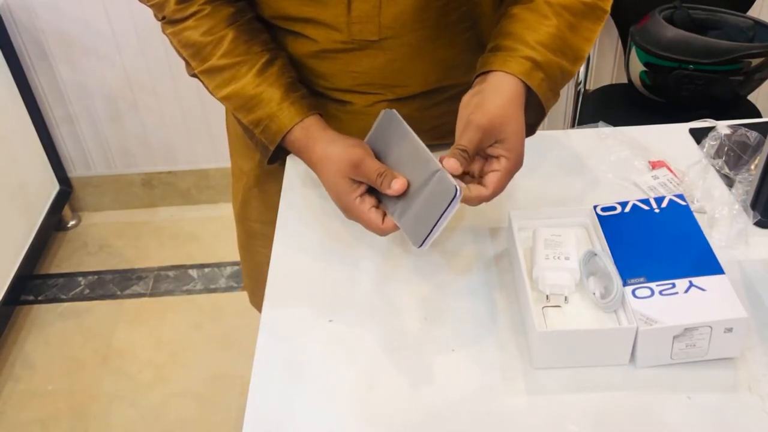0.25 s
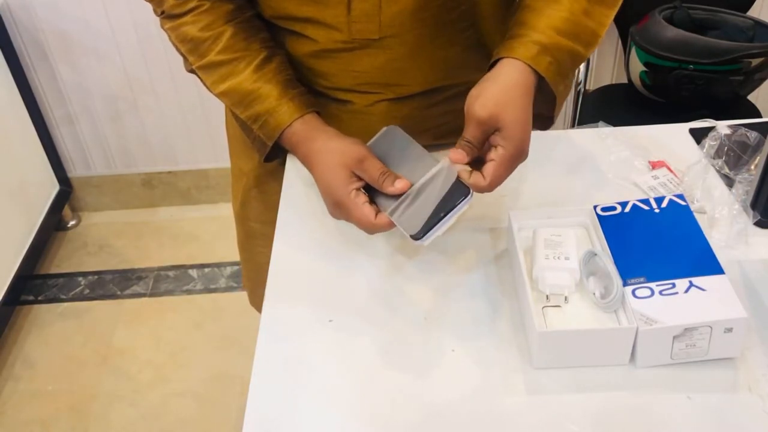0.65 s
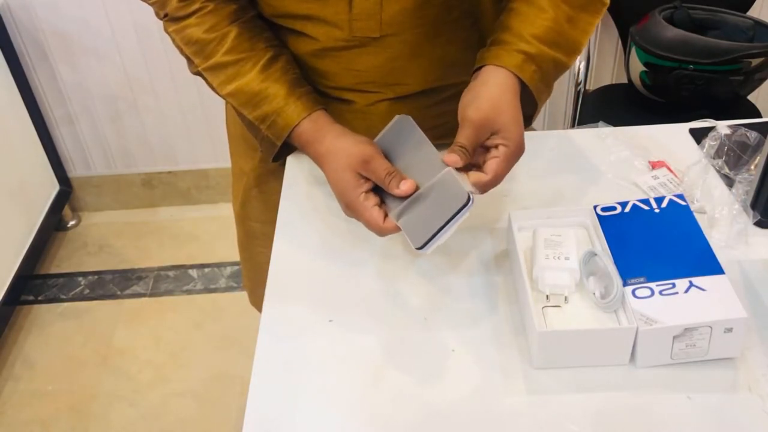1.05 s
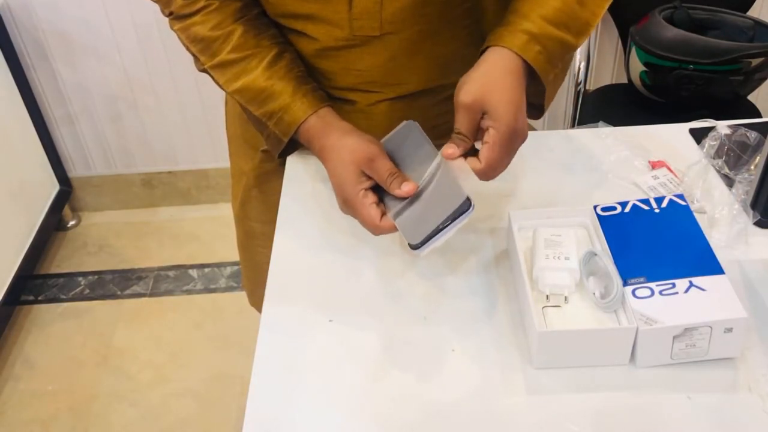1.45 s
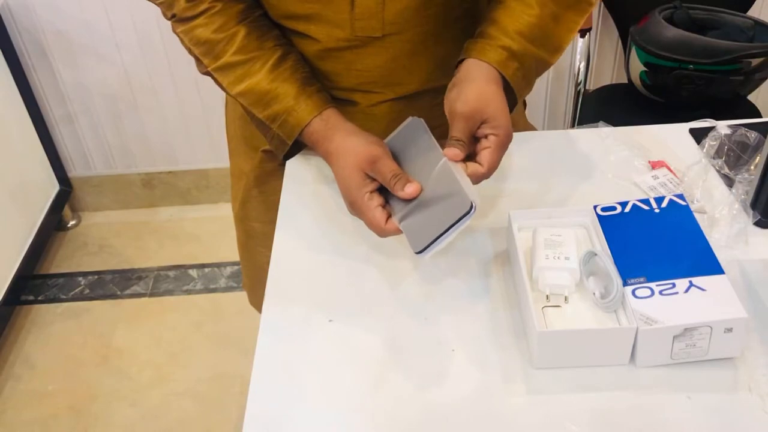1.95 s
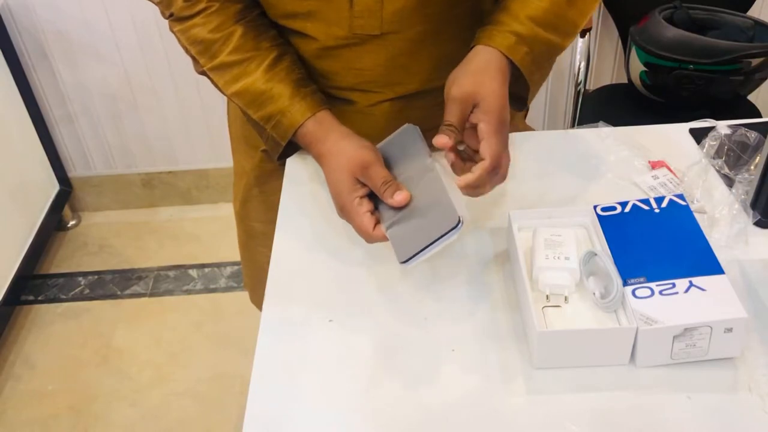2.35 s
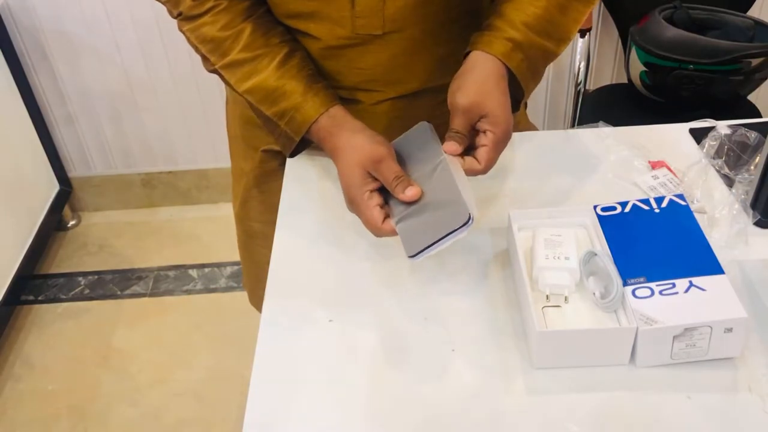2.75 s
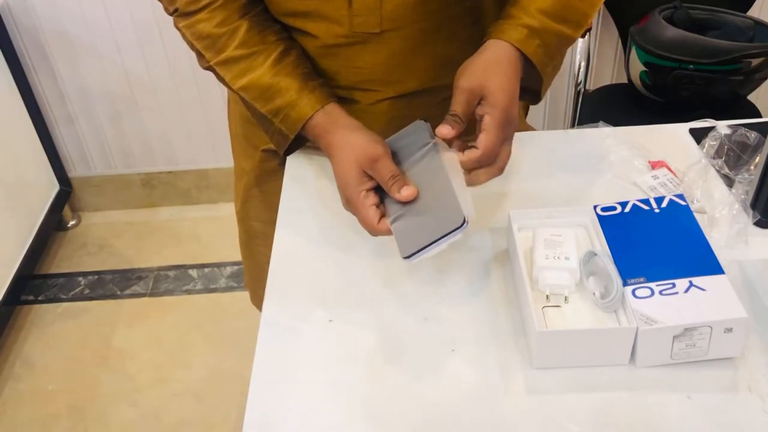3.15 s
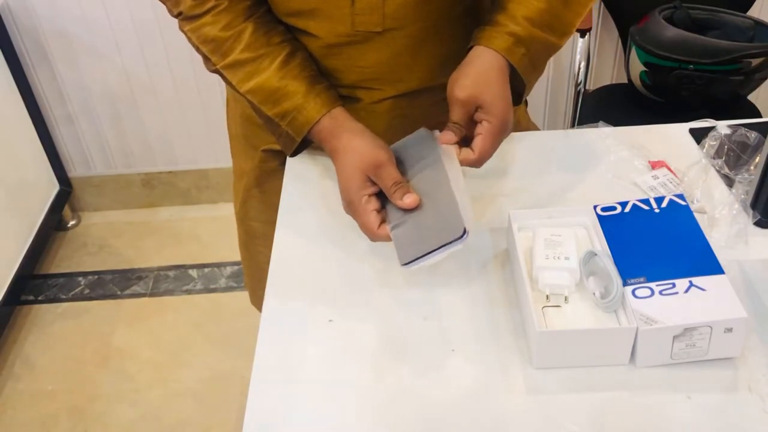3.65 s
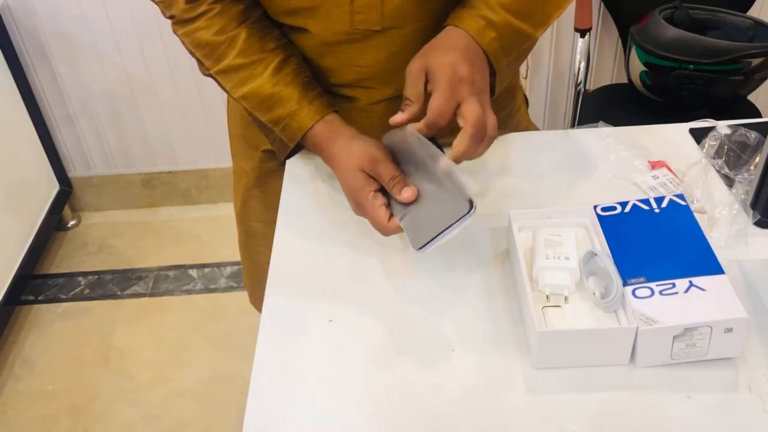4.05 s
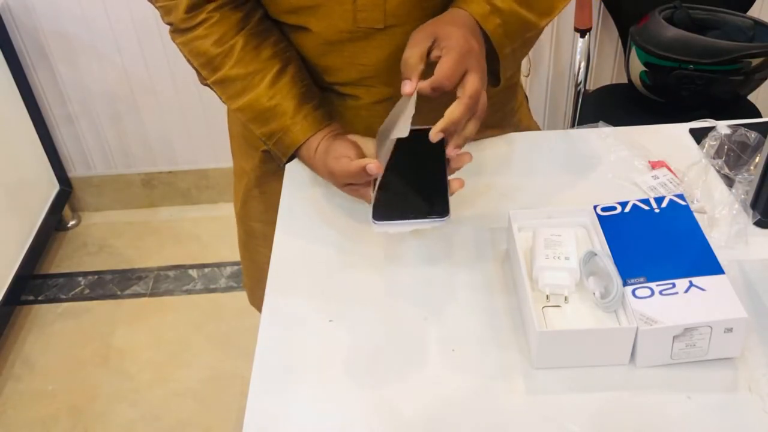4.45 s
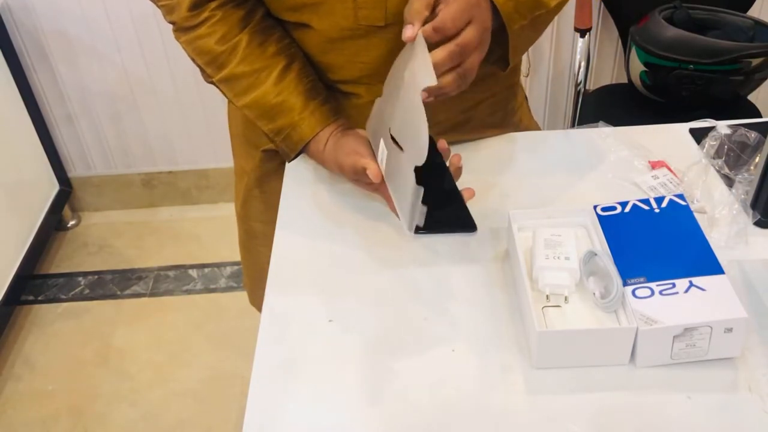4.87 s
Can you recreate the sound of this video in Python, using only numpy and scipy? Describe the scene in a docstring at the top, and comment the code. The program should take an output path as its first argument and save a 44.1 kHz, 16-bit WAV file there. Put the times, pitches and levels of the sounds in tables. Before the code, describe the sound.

Crisp plastic crinkling and snapping comes in flurries in a small hard-walled shop, thinning to faint ticks over quiet ventilation and a distant engine.

```python
"""In a small shop, close to the microphone, fingers pick at the thin plastic film around a new phone and peel it.
From the start there are air noise, a ventilation hum and a far engine drone, rising in pitch until 3.8 s.
From 0.2 to 3.6 s come flurries: film sizzling as it lets go, sharp snaps, hollow pops and a rubbing sleeve,
all made of shaped noise and pulses; film, snaps and pops also ring off the hard walls.
Then the snaps get sparser and mostly weaker, until after 4.9 s little but nail ticks and background remains."""
import sys
import numpy as np
from scipy import signal
from scipy.fft import rfft, irfft
from scipy.io import wavfile
from scipy.ndimage import uniform_filter1d

SR = 44100
rng = np.random.default_rng(int(sys.argv[2]) if len(sys.argv) > 2 else 0)


def master(y):
    """Save y as 16-bit WAV."""
    cut = np.clip(np.atleast_2d(y).T, -1, 1)
    pcm = np.round(cut * 32767)  # scale
    wavfile.write(sys.argv[1], SR, pcm.astype(np.int16))


N = 225457
EDGE_HZ = 16150  # upper limit of the recorder


def gain_of(db):
    """Decibels to an amplitude factor."""
    return 10 ** (np.asarray(db) / 20)


def evened(x):
    """Scales to rms 1."""
    return x / np.sqrt(np.mean(x ** 2) + 1e-20)


def with_energy(sound, db):
    """Scales a short sound to this energy below the recorder's upper limit."""
    audible = np.fft.rfftfreq(len(sound), 1 / SR) < EDGE_HZ
    return sound * gain_of(db) / np.sqrt(np.mean(abs(rfft(sound)) ** 2 * audible))


def read(points, hz):
    """Reads a spectrum table on a log-frequency axis."""
    f, value = np.transpose(points)
    return np.interp(np.log(hz + 1), np.log(f + 1), value)


def follow(rows):
    """The columns of a curve over time, at every sample."""
    s, *columns = np.transpose(rows)
    return [np.interp(np.arange(N) / SR, s, c) for c in columns]


def add(mix, s, sound):
    """Lays a sound into the mix at time s."""
    part = mix[max(round(s * SR), 0):][:len(sound)]
    part += sound[:len(part)]


def drift(hz):
    """Slow random wandering of rms 1, mostly below this frequency."""
    spectrum = rfft(rng.standard_normal(N))
    lowpass = np.exp(-(np.fft.rfftfreq(N, 1 / SR) / hz) ** 2)
    return evened(irfft(spectrum * lowpass, N))


def causal(gain):
    """Minimum-phase impulse response with this gain: it starts at once and rings out."""
    log_gain = np.log(np.maximum(gain, 1e-5))
    circle = np.r_[log_gain, log_gain[-2:0:-1]]
    return np.fft.ifft(np.exp(np.conj(signal.hilbert(circle)))).real


# Still air in the shop. Each row: frequency in Hz, relative level in dB per Hz.
AIR_COLOUR = [(20, -28), (40, -8), (65, -2.5), (85, -6.5), (120, -2.5), (165, 0), (220, -6), (400, -9),
              (800, -16), (1600, -37), (2300, -48), (3000, -17), (4000, -48), (6000, -29), (15000, -41)]
AIR_DB = -58  # rms


def still_air():
    """Steady noise of the room's air, shaped in frequency."""
    gain = gain_of(read(AIR_COLOUR, np.fft.rfftfreq(N, 1 / SR)))
    return gain_of(AIR_DB) * evened(irfft(rfft(rng.standard_normal(N)) * gain, N))


def tone(hz, db, waver=0.0049, throb=0.34):
    """A sine that wavers in pitch and strength by these random shares."""
    turns = np.cumsum(hz * (1 + waver * drift(4.9))) / SR + rng.random()
    steady = gain_of(db) * np.sqrt(2) * np.sin(2 * np.pi * turns)
    return steady * (1 + throb * drift(1.5))


# Tones of the ventilation. Each row: frequency in Hz, rms level in dB before swell and throb.
FAN_TONES = [(39, -94), (77, -71.5), (98, -83), (118, -66.5), (154.5, -62)]
# The hum swells and sinks. Each row: time in seconds, change of level in dB.
FAN_SWELL = [(0, 4.5), (.5, 0.5), (1.7, 3), (2.2, -7), (2.8, -1.5), (4.2, 1), (5.1, -1.5)]


def ventilation():
    """Wavering fan tones that swell and sink together."""
    swell_db, = follow(FAN_SWELL)
    return sum(tone(hz, db + swell_db) for hz, db in FAN_TONES)


# Engine outside. Each row: time in seconds, cycle rate in Hz,
# level of the first order in dB, level of the second order in dB (both rms, before throb).
FAR_ENGINE = [(0, 56, -76, -69), (1, 57, -74, -68), (1.3, 58, -70, -60), (1.85, 60, -70, -58),
              (2.15, 61, -66, -65), (3, 64, -65, -67), (3.5, 65.5, -66, -65), (3.8, 66, -76, -72),
              (5.11, 66, -78, -76)]


def far_engine():
    """The drone of an engine's two lowest orders, at its cycle rate and twice that."""
    cycle_hz, first_db, second_db = follow(FAR_ENGINE)
    return tone(cycle_hz, first_db) + tone(2 * cycle_hz, second_db)


# How long the shop rings. Each row: frequency in Hz, time to fall by 60 dB in seconds.
SHOP_T60 = [(300, 1), (700, 0.42), (1500, 0.6), (3000, 0.61), (5500, 0.64), (9000, 0.46), (15000, 0.32)]
# What the walls return to the microphone. Each row: frequency in Hz, gain in dB.
WALL_COLOUR = [(200, -23), (450, 2), (610, 8), (720, -0.5), (1200, -8.5), (2200, -7), (4500, -10),
               (8000, -8.5), (15000, -9)]


def tail(first_s=0.001, build_s=0.011, early=1.0, early_s=0.011, spread_db=2):
    """Reflections build up within milliseconds; each band then dies at its own speed."""
    age = np.maximum(np.arange(SR) / SR - first_s, 0)
    taps = rng.choice([-1, 1], SR) * (rng.random(SR) < .2)
    taps = taps * gain_of(spread_db * rng.standard_normal(SR))
    taps *= (1 - np.exp(-age / build_s)) * (1 + early * np.exp(-age / early_s))
    hz, t, z = signal.stft(taps, SR, nperseg=256)
    fade = gain_of(-60 * t / read(SHOP_T60, hz)[:, None])
    ringing = signal.istft(z * fade, SR)[1]
    walls = gain_of(read(WALL_COLOUR, np.fft.rfftfreq(len(ringing), 1 / SR)))
    return irfft(rfft(ringing / np.linalg.norm(ringing)) * walls)[:SR * 3 // 4]


def room(x, shift_hz=11, count=3):
    """The echo blends several random tails in steady rotation, so no single tail's colouring stands out."""
    angle = 2 * np.pi * shift_hz * np.arange(N) / SR
    shares = [np.sqrt(2 / count) * np.cos(angle + np.pi * k / count) for k in range(count)]
    return sum(signal.fftconvolve(x * share, tail())[:N] for share in shares)


def rub(strength, colour, slips_per_s, spread_db, flicker_db, flicker_hz, size=1024):
    """Many tiny releases a second, of flickering level, coloured by the surface that slides."""
    slips = gain_of(spread_db * np.minimum(rng.exponential(1, N), 4)) * rng.choice([-1, 1], N)
    slips *= rng.random(N) < slips_per_s / SR
    surface = causal(gain_of(read(colour, np.fft.rfftfreq(size, 1 / SR))))
    rubbing = evened(signal.oaconvolve(slips, surface)[:N])
    return strength * gain_of(flicker_db * drift(flicker_hz)) * rubbing


# The film under fingers and nails. Each row: frequency in Hz, relative level in dB per Hz.
FILM_COLOUR = [(250, -10.5), (500, -9), (1000, -2), (2100, 1), (4400, 2), (6500, -1), (12000, -3),
               (15500, 1.5)]
NAILS_DB = -67.5  # before flicker


def nails():
    """Nails ticking faintly on the film: sparse tiny releases throughout."""
    return rub(gain_of(NAILS_DB), FILM_COLOUR, slips_per_s=45, spread_db=1.8, flicker_db=2, flicker_hz=20)


# every move of the hand sets in quickly and eases off
ATTACK_DB_PER_S, RELEASE_DB_PER_S = 904, 293


def strokes(moves):
    """Strength of the hand's moves (start s, hold s, dB) at every sample: attack, hold, release."""
    t = np.arange(N) / SR
    levels = []
    for start, hold, db in moves:
        rise = ATTACK_DB_PER_S * np.maximum(start - t, 0)
        fall = RELEASE_DB_PER_S * np.maximum(t - start - hold, 0)
        levels.append(db - rise - fall)
    return gain_of(np.max(levels, axis=0))


# Pulls of the hand, shared by sleeve, film and creases. Each row: start in seconds, hold in seconds,
# level of the film coming unstuck in dB, typical energy of its small creases in dB, level of the sleeve in dB.
HAND_PULLS = [(0.389, 0.17, -52.5, -19, -63), (0.672, 0.075, -44.5, -16.5, -61),
              (1.18, 0.087, -55, -16, -62), (1.397, .12, -61, -24, -55), (1.98, 0.042, -50, -19, -63),
              (2.219, 0.029, -43.5, -12.5, -65), (2.698, 0.081, -49.5, -25, -63),
              (3.038, 0.032, -57, -23, -55.5), (3.564, 0.011, -35.5, -26, -53), (3.869, .16, -51, -26, -61),
              (4.137, .04, -48.5, -19.5, -77), (4.212, .1, -49, -23, -68), (4.329, 0.19, -49.5, -32, -65),
              (4.656, 0.028, -43, -33, -61), (4.718, 0.14, -47, -34, -62), (4.837, 0.023, -42.5, -35, -70)]
# The hand shifts its grip, only the sleeve brushes. Each row: start in seconds, hold in seconds, level in dB.
GRIP_SHIFTS = [(2.49, 0.037, -60), (3.136, .06, -62), (3.577, 0.2, -57)]
# Cloth of the sleeve. Each row: frequency in Hz, relative level in dB per Hz.
CLOTH_COLOUR = [(100, -22), (280, 7.5), (430, 10), (620, 2), (850, -5), (2000, -19), (8000, -63)]


def sleeve():
    """Cloth sliding with every pull and grip shift: dull, dense friction."""
    arm = strokes([(start, hold, sleeve_db) for start, hold, _, _, sleeve_db in HAND_PULLS] + GRIP_SHIFTS)
    return rub(arm, CLOTH_COLOUR, slips_per_s=1500, spread_db=2, flicker_db=1.2, flicker_hz=40)


REST_DB = -69.5  # the film rubbing faintly under the resting fingers, before flicker


def film_strength():
    """Strength of the film's friction: faint at rest, strong in each pull."""
    return gain_of(REST_DB) + strokes([(start, hold, film_db) for start, hold, film_db, _, _ in HAND_PULLS])


def adhesive_ticks(peel, ticks_db=-5):
    """A coarser crackle, hundreds of uneven ticks a second, as patches of adhesive let go."""
    ticks = rub(peel, FILM_COLOUR, slips_per_s=300, spread_db=2.8, flicker_db=2, flicker_hz=20)
    return gain_of(ticks_db) * ticks


def loose_sheet(x, ring_hz=2900, width_hz=700, ring=0.43, bend=0.31, bend_hz=9):
    """The lifted sheet adds a broad resonance that wanders as it bends."""
    turn = np.exp(2j * np.pi * np.cumsum(ring_hz * np.exp(bend * drift(bend_hz))) / SR)
    r = np.exp(-np.pi * width_hz / SR)
    # shift the resonance down to zero, smooth, and shift it back up
    resonance = turn * signal.lfilter([1 - r], [1, -r], x / turn)
    return x + ring * 2 * resonance.real


def sizzle(peel):
    """The film coming unstuck in thousands of tiny releases a second, through the lifted sheet."""
    releases = rub(peel, FILM_COLOUR, slips_per_s=4000, spread_db=-0.5, flicker_db=2.8, flicker_hz=45)
    return loose_sheet(releases)


# The whole sheet flips over with a hollow pop. Each row: start in seconds, energy in dB at the microphone,
# centre in Hz, share sent into the room in dB relative to that energy.
SHEET_POPS = [(.2563, -15, 1800, 6), (.6403, -23.5, 1080, -1), (.6753, -18, 1200, -6), (.711, -10, 740, -4),
              (1.2066, -14, 1400, 4), (1.2609, -12.5, 1640, -0.5), (1.4187, -1, 1115, -3),
              (1.4662, -15, 920, 1), (2.0209, -15.5, 1210, 0.5), (2.226, -13, 1040, 0.5),
              (3.033, 2, 1235, -2.5), (3.5367, -22.5, 1210, -11), (3.5593, -11.5, 1390, -5),
              (3.5692, -20.5, 660, 0)]


def pops(sharpness=1.38, lowest_hz=620, size=1024):
    """The sheet flips against the air, a low pulse of two or three cycles: (at the microphone, all round)."""
    hz = np.fft.rfftfreq(size, 1 / SR) + 20
    near, around = np.zeros(N), np.zeros(N)
    for s, db, centre_hz, room_db in SHEET_POPS:
        band = 1 / (1 + (sharpness * (hz / centre_hz - centre_hz / hz)) ** 2)
        pop = with_energy(causal(band / np.hypot(1, (lowest_hz / hz) ** 4)), db)
        add(near, s, pop)
        add(around, s, pop * gain_of(room_db))
    return near, around


# small creases give way during a pull and while it is being taken up; the spreads are random
CREASE_LEAD_S, CREASE_SPREAD_DB = .012, 2
CREASE_EDGE_HZ, CREASE_OCTAVES, CREASE_TILT_DB = 2070, 0.66, -2.5  # typical lower edge, its spread, dB/octave


def creases(count=8):
    """A few small random snaps around each pull, as rows like those of the clear snaps."""
    rows = []
    for start, hold, _, crease_db, _ in HAND_PULLS:
        for when, (strength, width) in zip(rng.random(count), rng.standard_normal((count, 2))):
            s = start - CREASE_LEAD_S + when * (hold + CREASE_LEAD_S)
            db = crease_db + CREASE_SPREAD_DB * strength
            edge_hz = CREASE_EDGE_HZ * 2 ** (CREASE_OCTAVES * width)
            rows.append((s, db, edge_hz, CREASE_TILT_DB))
    return rows


def buckle(slip_s=0.00022, flutter_s=0.0016, flutter=0.39, echo=0.51, echo_s=0.000677, size=1024, order=33):
    """Spectrum of one buckling: a rush of tiny slips, a brief flutter, and a short echo off the table top."""
    t, hz = np.arange(size) / SR, np.fft.rfftfreq(size, 1 / SR)
    rush = (t / slip_s) ** 2 * np.exp(2 - 2 * t / slip_s) + flutter * np.exp(-t / flutter_s)
    z = rfft(rush * rng.laplace(size=size))
    z *= 1 + echo * np.exp(-2j * np.pi * hz * echo_s * rng.uniform(0.58, 1.27))
    return z / np.sqrt(uniform_filter1d(abs(z) ** 2, order))  # even over broad bands, ragged in detail


# The clear snaps of the film, close by. Each row: time in seconds, energy in dB, lower edge in Hz,
# tilt above that edge in dB per octave.
CLEAR_SNAPS = [(0.1604, -15.5, 1100.0, 4.5), (0.2152, -23.5, 1310, -1.5), (0.256, -3, 1810, -0.5),
               (0.2957, -19, 1870, -3), (0.3021, -11.5, 3600, 9), (0.3159, -15, 4320, -17),
               (0.3412, -5.0, 3050.0, 1), (0.3875, -16, 2100, 3), (0.3911, -4.5, 3470, -1.5),
               (0.4148, 5, 3230.0, 3.5), (0.4233, -8, 1800, 0), (0.4331, -4.5, 3300, -5),
               (0.448, -10, 2450, -2), (0.4752, -16, 1090, 0.5), (0.4801, -7.5, 3040, -3),
               (0.4922, -2.5, 3830, -8.5), (0.5266, 0, 2680, 2), (0.5468, -9.5, 2000, -1),
               (0.6248, -2, 3680, -5), (0.641, -3, 2800, 1.5), (0.6495, -11, 3600, -3),
               (0.6725, -3.5, 3540, -5), (0.6882, -7.5, 2900, -9), (0.6968, -8.5, 4500, -3),
               (0.7038, -10.5, 2300.0, 2), (0.7107, -4.5, 2200, -3.5), (0.774, -3, 7850, 1),
               (0.9328, -19.5, 1850, 1), (0.9642, -14, 1090, 0.5), (0.9857, -15.0, 1050, -1),
               (1.1073, -27, 1900, -1), (1.129, -8, 4340, 6), (1.1482, -9.5, 5380.0, 0),
               (1.1673, -8, 4760, 0), (1.1802, -14, 7200, -1), (1.188, -9.5, 4800, 3),
               (1.1936, -15, 3700, 4), (1.1998, 0.5, 3680, -2), (1.2054, 1.5, 3900, -0.5),
               (1.2148, 5.5, 2480, 1.5), (1.2245, -2.5, 4050.0, 2), (1.2292, -2, 1800, 5),
               (1.2351, 1, 3200, 3.5), (1.2601, -1, 2880.0, 1.0), (1.3398, -7, 4340, -5),
               (1.3962, -2.5, 4870, -19), (1.3979, 5.0, 3470, -4.5), (1.4018, -2.5, 4290.0, -11),
               (1.4158, 0, 1790, -3), (1.4184, -5, 2360, -11), (1.4432, 2.5, 7240, 1),
               (1.4659, 0.5, 3200, -2.5), (1.4693, -7, 1400, -4), (1.7154, -12, 1940.0, 6),
               (1.7544, -13, 2550, -8.5), (1.7768, -13, 4200, -10), (1.8016, -3.5, 4030, -9.5),
               (1.9355, -17.5, 2500, 2), (1.946, -8, 4230, -1), (1.9617, -12, 4800, 4),
               (1.9666, -1.5, 3640, -1.5), (1.9831, -3, 2600, 3.5), (1.9856, -1.0, 4670, -4),
               (1.9911, -2.5, 4600, -9), (1.9945, 0.5, 3440, -3.0), (2.0198, -5.0, 3230.0, 4.5),
               (2.0803, -13.5, 4970, -10), (2.1592, -21, 1070, -14), (2.1994, -12, 3300, -12),
               (2.2167, -3, 3420.0, -4), (2.2247, -3.5, 1800, -3.5), (2.2427, -4.5, 4050.0, 5),
               (2.2491, -12, 1080, 0.5), (2.4967, -22.5, 1070, -4), (2.5103, -23, 1080, -5.5),
               (2.5694, -22, 1080, -8), (2.6289, -11, 2300.0, 1), (2.6686, -11.5, 3620.0, -4.0),
               (2.6974, -5.5, 3930, -9), (2.7044, -8, 2920, -5), (2.7266, -1.5, 3020, -1),
               (2.7335, -6.5, 1080, 1), (2.7453, -3.0, 2340, 3), (2.7635, -1, 4500, -1),
               (2.7701, -5.5, 4330, 0.5), (2.8958, -0.5, 3770, -1), (2.978, -8, 3050.0, -4.5),
               (2.9903, 0, 5080.0, -9.5), (3.0036, -14, 2900, 4), (3.0327, 2.5, 2680, -5),
               (3.0491, -10, 1300, -2), (3.0602, -2.5, 4340, -1.0), (3.0681, -7.5, 3500, -10),
               (3.0736, -4, 3040, -5.0), (3.2224, -14.5, 2740, 0.5), (3.5364, -11, 3230.0, -11),
               (3.5558, -0.5, 3000, 9), (3.5582, 0, 3620.0, -3), (3.5702, -9.5, 1300, -1),
               (3.5815, -3, 3230.0, -5), (3.8048, -18, 1800, -3), (3.8284, -12, 3830.0, -12),
               (3.8458, -11.5, 2480, -3.5), (3.8586, -10.5, 2300.0, -7), (3.8775, -7.5, 1600, -2),
               (3.888, -0.5, 4370, 1), (3.9637, -13.5, 4560, 2), (4.0271, -15.5, 1530, -0.5),
               (4.0368, -14.5, 3620.0, -5), (4.0478, -17.5, 1500, -3), (4.1267, -13.5, 1580, 0),
               (4.1378, -3, 4050.0, 0.5), (4.2086, -27, 2400, -4), (4.2256, -23, 1800, -2),
               (4.2882, -12, 2510, -7.5), (4.4052, -5.5, 1160.0, 11), (4.4085, -14, 1630, -6.5),
               (4.6572, -21, 1640.0, -0.5), (4.7422, -24, 1400, -8)]
# a buckling facet rings briefly in the treble: typical Hz, height in dB, chance spread in octaves
RING_HZ, RING_DB, RING_SPREAD = 5320, 5.5, 0.42


def snaps(ring_octaves=0.19, body_db=-17, body_hz=850, ring_in_room=0.55, size=1024, count=64):
    """Each facet radiates above an edge set by its size and rings a few cycles: (at the microphone, all round)."""
    hz = np.fft.rfftfreq(size, 1 / SR) + 20
    near, around = np.zeros(N), np.zeros(N)
    # the sheet around the facet moves a little too
    body = gain_of(body_db) / np.hypot(1, (body_hz / hz) ** 2)
    for s, db, edge_hz, tilt in list(CLEAR_SNAPS) + creases():
        slope = gain_of(tilt * np.log2(np.maximum(hz / edge_hz, 1)))
        facet = slope / np.hypot(1, (edge_hz / hz) ** 4)
        colour = np.hypot(facet, body)
        ring_hz = RING_HZ * 2 ** (RING_SPREAD * rng.standard_normal())
        ring = RING_DB * np.exp(-(np.log2(hz / ring_hz) / ring_octaves) ** 2)
        # evening the spectrum spreads the onset a little ahead, so start `count` samples early
        snap = np.roll(irfft(buckle() * rfft(causal(colour * gain_of(ring)))), count)
        add(near, s - count / SR, with_energy(snap, db))
        # summed over all directions, the peaks and notches of one direction even out
        add(around, s, with_energy(causal(colour * gain_of(ring_in_room * ring)), db))
    return near, around


def scene(sizzle_room_db=1):
    """The film close to the microphone, its echo in the shop, and the background."""
    background = still_air() + ventilation() + far_engine()
    peel = film_strength()
    sizzling = sizzle(peel)
    friction = nails() + sleeve() + adhesive_ticks(peel) + sizzling
    popping, popping_around = pops()
    crackle, crackle_around = snaps()
    echo = room(crackle_around + popping_around + sizzling * gain_of(sizzle_room_db))
    return (background + echo + friction + popping + crackle)[None]


def record(dry):
    """The recorder's upper band limit, a steep linear-phase low-pass."""
    lowpass = signal.firwin(255, EDGE_HZ, window=("kaiser", 8), fs=SR)
    return signal.oaconvolve(dry, lowpass[None], "same")


dry = scene()
out = record(dry)
master(out)
```